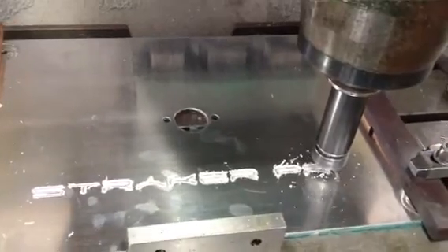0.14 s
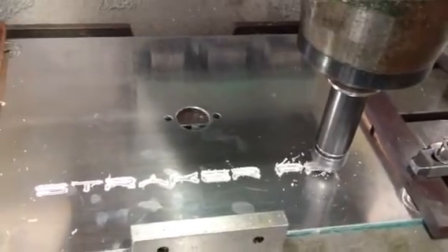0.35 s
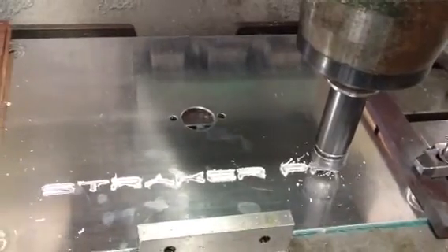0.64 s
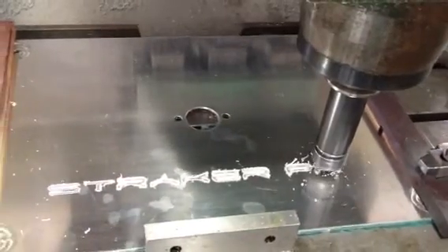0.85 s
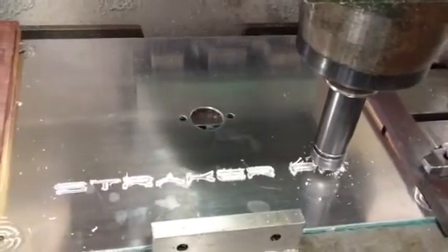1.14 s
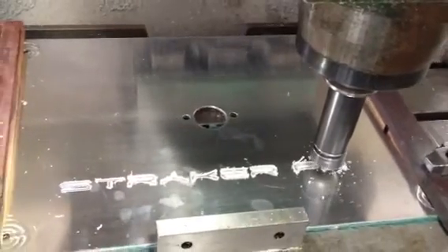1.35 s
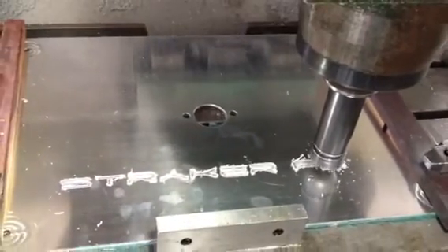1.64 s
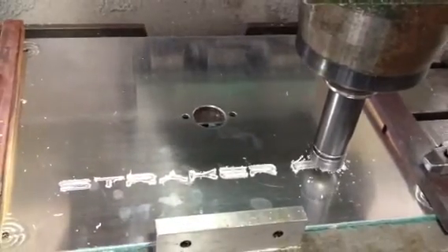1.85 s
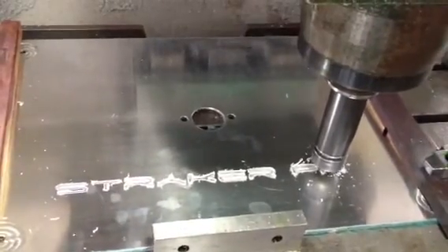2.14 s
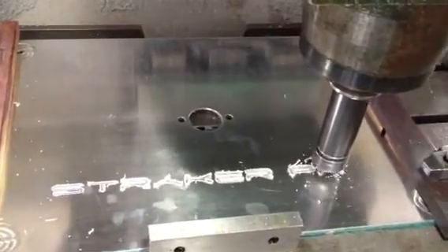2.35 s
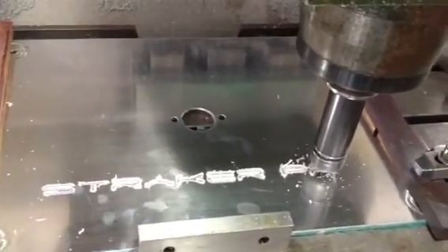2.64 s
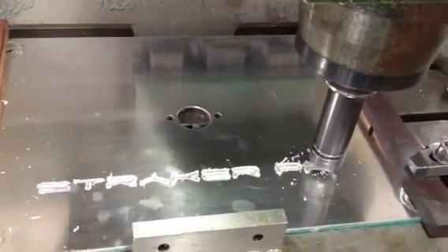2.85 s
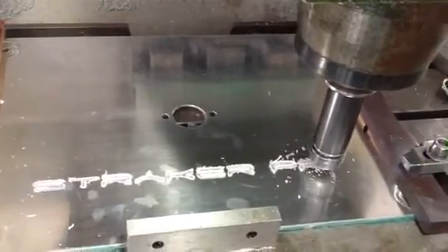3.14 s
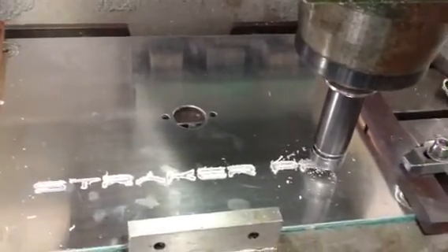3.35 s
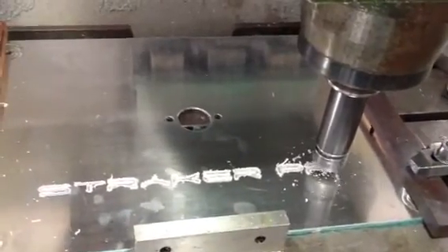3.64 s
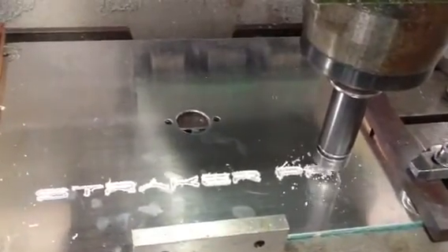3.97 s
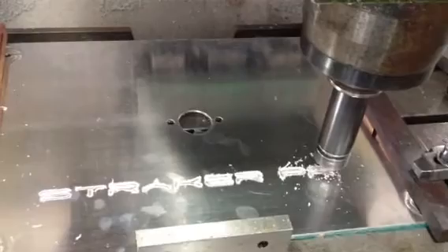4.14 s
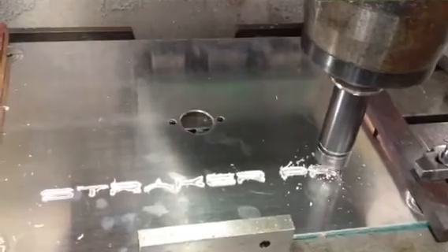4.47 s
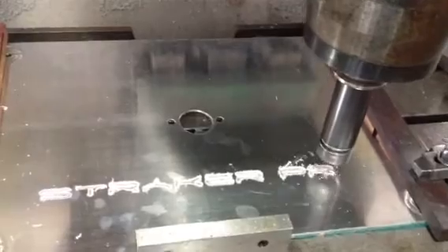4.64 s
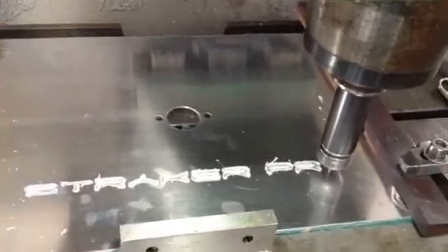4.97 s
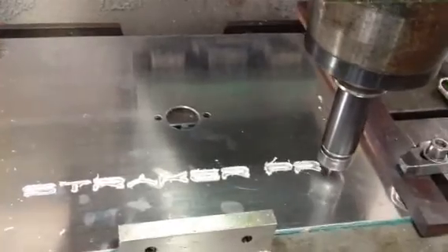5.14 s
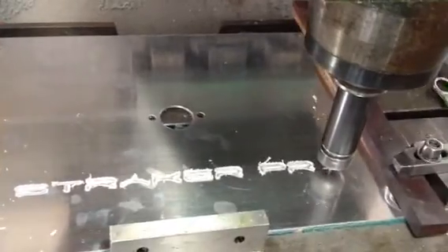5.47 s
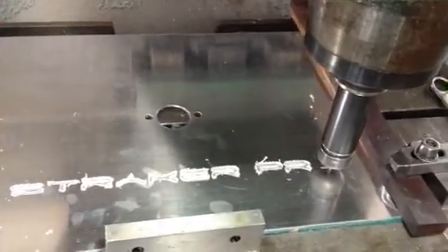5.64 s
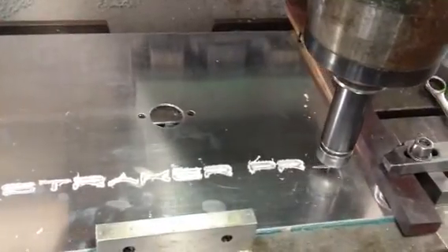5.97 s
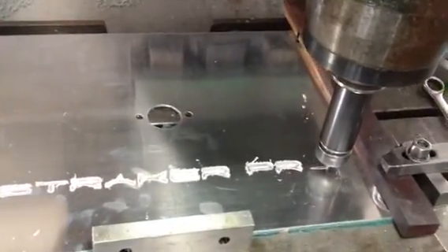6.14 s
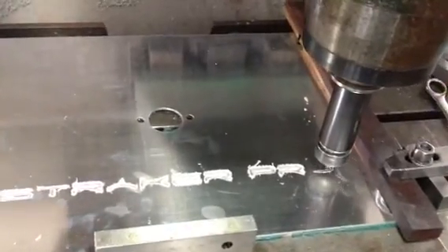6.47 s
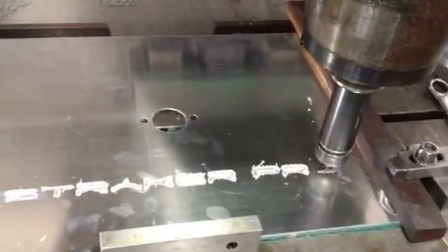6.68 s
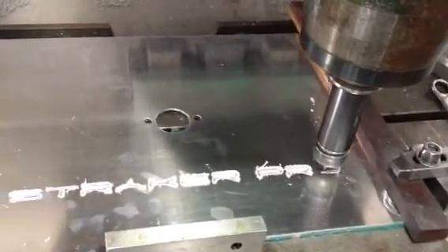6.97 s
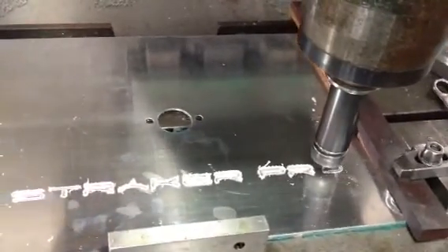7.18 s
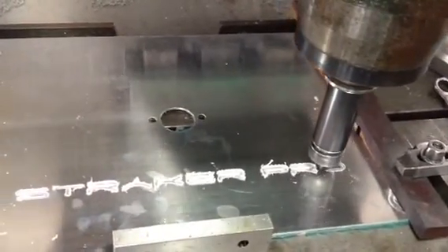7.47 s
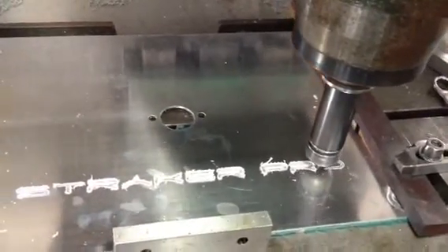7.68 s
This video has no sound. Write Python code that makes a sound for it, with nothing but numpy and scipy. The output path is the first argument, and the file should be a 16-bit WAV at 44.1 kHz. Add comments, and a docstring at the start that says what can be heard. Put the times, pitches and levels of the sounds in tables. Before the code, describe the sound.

Close to a milling machine in a workshop, steady gear and motor tones beat over a fast repeating clatter, dull for nearly three seconds and then opening up. A low, rough cutter scrape builds slowly, holds and drops. Two light puffs of compressed air lead to a strong half-second hissing, whistling blast with low thumps at the plate. The machine runs on and a second, weaker scrape swells. Mono phone microphone.

```python
"""Milling machine with compressed air

A milling machine engraves a metal plate, heard from close by on a phone, in mono.
Gears, drive and bearings are steady tones that sing and beat over a clatter of noise repeating every turn.
All of it sounds muffled at first, then opens up; the cutter's scrape, a pulsing noise, swells twice.
Compressed air, two light puffs and a full blast of hiss and whistles, clears the chips.
Low thumps at the plate, short tones of unsteady pitch, come mostly during the blast.
"""
import sys
import numpy as np
from scipy import signal
from scipy.fft import rfft, irfft, next_fast_len
from scipy.io import wavfile

SR = 44100
rng = np.random.default_rng(int(sys.argv[2]) if len(sys.argv) > 2 else 0)


def store_pcm(level_fs):
    """Save levels as 16-bit WAV."""
    pcm = np.round(np.clip(level_fs, -1, 1) * 32767).astype(np.int16)
    wavfile.write(sys.argv[1], SR, np.atleast_2d(pcm).T)


N = 344421
TIME = np.arange(N) / SR  # seconds
SPINDLE_HZ = 22.318  # turns per second

# Levels in the tables hold before any later gain, muffling or room.
# Gear tones: [f/spindle rate, rms level/dB]
GEAR_TONES = [(5,-58), (7,-59), (13,-56), (14,-50), (15,-49), (16,-37), (17,-45), (18,-55), (21,-55),
              (22,-51), (23,-56), (26,-52), (27,-49), (28,-44.5), (29,-44.5), (31,-50), (33,-51), (37,-55),
              (39,-53), (42,-53), (48,-53), (49,-57), (50,-53), (56,-50), (58,-53), (60,-54), (61,-58),
              (68,-57), (69,-59), (72,-54), (77,-57), (91,-58), (99,-57), (100,-59), (107,-58), (126,-59),
              (138,-60), (148,-59), (149,-60), (162,-60), (163,-60)]
# Teeth of the two loudest gears, which mesh at this multiple of the spindle rate: [f/spindle rate]
MESH_TEETH = [16, 28]
# Motor and belt tones, out of step with the spindle: [f/Hz, rms level/dB]
DRIVE_TONES = [(117.3,-57), (188.3,-55), (230.5,-44.7), (251.1,-52), (345.3,-40), (452.2,-55), (484.7,-50),
               (541.6,-55), (879.3,-55), (969.5,-57)]
# Thin high whines of bearings and drive, the lowest 117.3 Hz below the next: [f/Hz, rms level/dB]
HIGH_WHINES = [(1830.7,-51), (1948,-51), (2116.6,-59), (2147.7,-59), (5766.2,-62.5), (8567,-81)]
# What the machine casing gives off when rattled: [f/Hz, level per Hz/dB]
CASING_SPECTRUM = [(30, -105), (75, -89), (105, -76.5), (150, -65), (260, -65.5), (420, -69.5),
                   (700, -66.5), (1200, -72), (2100, -73), (3600, -78.5), (5500, -84.5), (7000, -91),
                   (9300, -101), (14000, -101)]
# Ringing of the bearings: [f/Hz, width to either side/Hz, level per Hz/dB]
BEARING_RINGS = [(1830, 41, -78.5), (1964, 45, -72.5), (3270, 100, -78.5), (3670, 45, -76),
                 (6640, 140, -84.5), (7280, 250, -91)]
# Gain when fully muffled: [f/Hz, gain/dB]
MUFFLE_GAIN = [(110, -6), (220, -1.5), (350, -8), (480, -6), (640, -11), (900, -11), (1400, -17.5),
               (1900, -17.5), (2700, -23), (5000, -25.5), (6700, -21), (9000, -26), (14000, -28)]
# Scrape of the cutter in metal: [f/Hz, level per Hz/dB]
SCRAPE_SPECTRUM = [(60, -105), (95, -92), (140, -68.5), (280, -64.5), (500, -61), (750, -65.5), (1200, -71),
                   (4000, -85), (9000, -115)]
# Swells of the cutter's scrape: [builds from t/s, falls from t/s, level/dB]
SCRAPE_SWELLS = [(2.1, 4.55, -2), (5.35, 7.8, -5.5)]
# Puffs of the air gun: [opens t/s, rise/s, closes t/s, fade/s, level/dB,
# extra treble at opening/dB, extra treble at closing/dB]
AIR_PUFFS = [(3.045, .115, 3.25, .15, -20, 3.5, -3), (4.225, .11, 4.58, .04, -13, -2, -4),
             (4.52, .175, 5.03, .022, 0, -.5, 5)]
# Hiss of the jet: [f/Hz, level per Hz/dB]
HISS_SPECTRUM = [(300, -92), (1000, -76), (1600, -65.5), (2400, -63), (2800, -60), (4300, -55), (5000, -56),
                 (5800, -57.5), (7100, -59.5), (7800, -64), (10200, -69.5), (12000, -66), (13700, -63.5),
                 (15300, -68.5)]
# Resonances of nozzle and gap under the cutter: [f/Hz, width to either side/Hz, level per Hz/dB]
NOZZLE_RESONANCES = [(1320, 62, -60), (2760, 100, -56), (3310, 82, -55), (3810, 50, -59), (4270, 150, -53),
                     (5466, 41, -50), (6104, 86, -48.5), (6420, 40, -56.5), (7030, 160, -55),
                     (8120, 34, -54), (8410, 38, -56), (9230, 120, -62)]
# Low thumps at the plate, most of them during the air blast: [peak t/s, length/s, f/Hz, rms level at peak/dB]
PLATE_THUMPS = [(3.735, 0.032, 150.8, -36), (4.523, 0.017, 285, -24.5), (4.544, .04, 148, -34.5),
                (4.66, 0.037, 156.6, -34), (4.777, .018, 141, -33), (4.958, .03, 152, -34.5)]
# Steady hiss of the microphone: [f/Hz, level per Hz/dB]
MIC_SPECTRUM = [(30, -112), (5000, -118), (9500, -124), (12000, -120), (15000, -116)]

# The muffling eases by a share from EASES_S on, then lifts within LIFT_S from LIFTS_S on
EASES_S, EASED_SHARE, LIFTS_S, LIFT_S = 1.8, 0.19, 2.667, 0.54
# Time the scrape takes to build and to fall; how much louder the machine runs at a scrape strength of 1
BUILD_S, FALL_S, LOUDER_DB = 1.82, 0.71, 1
# Brief overshoot as the air valve reaches full opening, for a flow of 1
SURGE_DB, SURGE_S = 3.5, 0.019
TOP_HZ = 15300  # the phone keeps nothing much above this


def undb(db):
    """Turns decibels into a gain."""
    return 10 ** (np.asarray(db) / 20)


def noise():
    """White noise of rms 1."""
    return rng.standard_normal(N)


def unit(x):
    """Scales to rms 1."""
    return x / np.sqrt(np.mean(x ** 2))


def walk(rate):
    """A random wander with a new goal rate times a second; spread 1."""
    knots = rng.standard_normal(4096)
    return unit(np.interp(TIME * rate, np.arange(len(knots)), knots))


def each_turn(count):
    """A random pattern of count values round the spindle, met again on every turn."""
    angles = np.arange(count) / count
    return unit(np.interp(TIME * SPINDLE_HZ, angles, rng.standard_normal(count), period=1))


def ramp(start, length, t=TIME):
    """Rises evenly from 0 to 1 in length seconds."""
    return np.clip((t - start) / length, 0, 1)


def above(x, hz, order=3):
    """Keeps what lies above hz, without delay."""
    return signal.sosfiltfilt(signal.butter(order, hz, "high", fs=SR, output="sos"), x)


def shape_db(hz, points):
    """Reads a spectrum's level at the given frequencies, straight between points on a log scale."""
    points = np.array(points, float)
    return np.interp(np.log(hz + 1e-9), np.log(points[:, 0]), points[:, 1])


def colour(x, points=(), modes=()):
    """Gives a white signal of rms 1 a broad spectrum plus resonances, in dB per Hz."""
    size = next_fast_len(N + SR // 4)  # padding keeps the two ends apart
    hz = np.fft.rfftfreq(size, 1 / SR)
    power = undb(shape_db(hz, points)) ** 2 if len(points) else 0
    for centre, width, db in modes:
        power = power + undb(db) ** 2 / (1 + ((hz - centre) / width) ** 2) ** 2
    gain = np.sqrt(power * SR / 2)
    return irfft(rfft(x, size) * gain, size)[:N]


def tones(lines, phases, waver_db, wobble):
    """Steady tones, each wavering a little in level (dB) and phase (radians)."""
    out = 0
    for (hz, db), start in zip(lines, phases):
        phase = 2 * np.pi * hz * TIME + start + wobble * walk(5)
        level = np.sqrt(2) * undb(db + waver_db * walk(7))
        out = out + level * np.sin(phase)
    return out


def random_phases(count):
    """Random starting points within a cycle, in radians."""
    return 2 * np.pi * rng.random(count)


def scrape_strength():
    """How strong the scrape is: in each swell it builds slowly, holds, and falls."""
    strength = 0
    for builds, falls, db in SCRAPE_SWELLS:
        strength = strength + undb(db) * ramp(builds, BUILD_S) * (1 - ramp(falls, FALL_S))
    return strength


def gears():
    """Gears run slightly off centre: tones beside each mesh tone swing mainly its pitch, once a turn."""
    orders, db = np.transpose(GEAR_TONES)
    phases = random_phases(int(orders.max()) + 1)
    for teeth in MESH_TEETH:
        # for a swing in pitch, the side tones share the mesh tone's phase, the first lower one inverted
        phases[teeth - 2:teeth + 3] = phases[teeth]
        phases[teeth - 1] += np.pi
    return tones(zip(orders * SPINDLE_HZ, db), phases[orders.astype(int)], waver_db=1.0, wobble=0.13)


def drive():
    """Motor and belt hum at their own rates, out of step with the spindle."""
    return tones(DRIVE_TONES, random_phases(len(DRIVE_TONES)), waver_db=2.5, wobble=0.12)


def whines():
    """Bearings and drive whine in thin, high tones."""
    return tones(HIGH_WHINES, random_phases(len(HIGH_WHINES)), waver_db=2.0, wobble=0.17)


def clatter(repeat_db=-7, tooth_db=0.74, fault_hz=1500):
    """Tooth faults rattle the casing alike on every turn; loose rattle swells at the same rough teeth."""
    turn = round(SR / SPINDLE_HZ)  # samples
    faults = above(np.resize(rng.standard_normal(turn), N), fault_hz)
    contact = unit(undb(tooth_db * each_turn(count=28)))
    rattle = contact * (undb(repeat_db) * faults + noise())
    return colour(rattle, CASING_SPECTRUM, BEARING_RINGS)


def machine():
    """Close gear and drive tones beat about twelve times a second; all grows louder as the scrape swells."""
    louder = undb(LOUDER_DB * scrape_strength())
    return louder * (gears() + drive() + whines() + clatter())


def muffle(x, lag=0.058):
    """Dulls the sound, the treble most, and lets it open up, lag s later for each octave higher."""
    hz, s, frames = signal.stft(x, SR, nperseg=1024)
    octaves = np.log2(np.maximum(hz, 250) / 2000)  # the times hold at 2000 Hz
    t = s - lag * octaves[:, None]
    eased = 1 - EASED_SHARE * ramp(EASES_S, LIFTS_S - EASES_S, t)
    share = eased * (1 - ramp(LIFTS_S, LIFT_S, t))  # 1 is fully muffled, 0 is open
    gain = undb(shape_db(hz, MUFFLE_GAIN)[:, None] * share)
    return signal.istft(frames * gain, SR)[1][:N]


def microphone_hiss():
    """Steady faint noise of the microphone itself."""
    return colour(noise(), MIC_SPECTRUM)


def cutter(chip_db=2.5):
    """The edge scrapes hardest at the same places of each turn."""
    grip = unit(undb(chip_db * each_turn(count=10)))
    return scrape_strength() * colour(noise() * grip, SCRAPE_SPECTRUM)


def air_jet(split_hz=7500, whistle_db=-1):
    """Each puff of turbulent hiss swells, holds and fades; strong flow favours the nozzle resonances."""
    hiss = colour(noise(), HISS_SPECTRUM)
    whistles = undb(whistle_db) * colour(noise(), modes=NOZZLE_RESONANCES)
    treble = above(hiss, split_hz)
    out = 0
    for opens, rise, closes, fade, db, first_db, last_db in AIR_PUFFS:
        swell = np.sin(np.pi / 2 * ramp(opens, rise)) ** 2
        flow = undb(db) * swell * np.exp(-np.maximum(TIME - closes, 0) / fade)
        # the stronger the flow, the more it overshoots
        surge = undb(SURGE_DB * flow * np.exp(-((TIME - opens - rise) / SURGE_S) ** 2))
        # brightness drifts from opening to closing
        bright = undb(first_db + (last_db - first_db) * ramp(opens, closes - opens))
        out = out + flow * surge * (hiss + (bright - 1) * treble + np.sqrt(flow) * whistles)
    return out


def workshop(x, room_db=-9, t60_low=0.7, t60_high=0.55, damp_hz=7000):
    """Adds the tail of the room, shorter in the treble; t60 is the time in s to fall by 60 dB."""
    t, tail = TIME[:SR], rng.standard_normal(SR)
    high = above(tail, damp_hz)
    low = tail - high
    tail = low * np.exp(-np.log(1000) * t / t60_low) + high * np.exp(-np.log(1000) * t / t60_high)
    return x + undb(room_db) * signal.fftconvolve(x, tail / np.linalg.norm(tail))[:N]


def thumps(spread=0.152, lowest_hz=105):
    """Low thumps at the plate, most of them during the air blast: short swells, unsteady in pitch."""
    out = 0
    for s, length, hz, db in PLATE_THUMPS:
        phase = 2 * np.pi * np.cumsum(hz * (1 + spread * walk(250))) / SR
        swell = np.exp(-((TIME - s) / length) ** 2)
        out = out + np.sqrt(2) * undb(db) * swell * np.sin(phase)
    return above(out, lowest_hz, order=4)


def scene(air_db=-1):
    """Machine, cutter, air jet, thumps and microphone hiss, the same in both ears."""
    milling = muffle(machine() + cutter())
    air = undb(air_db) * workshop(air_jet())
    mono = milling + air + thumps() + microphone_hiss()
    return np.array([mono, mono])


def record(dry):
    """The phone cuts the top steeply."""
    return signal.sosfilt(signal.ellip(12, .2, 90, TOP_HZ, fs=SR, output="sos"), dry)


dry = scene()
out = record(dry)
store_pcm(out)
```